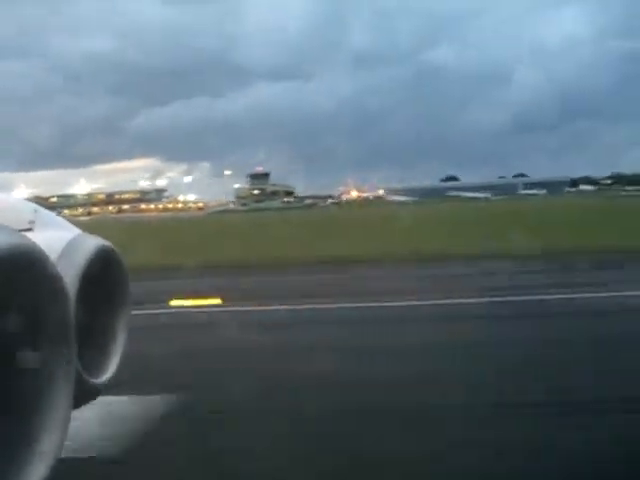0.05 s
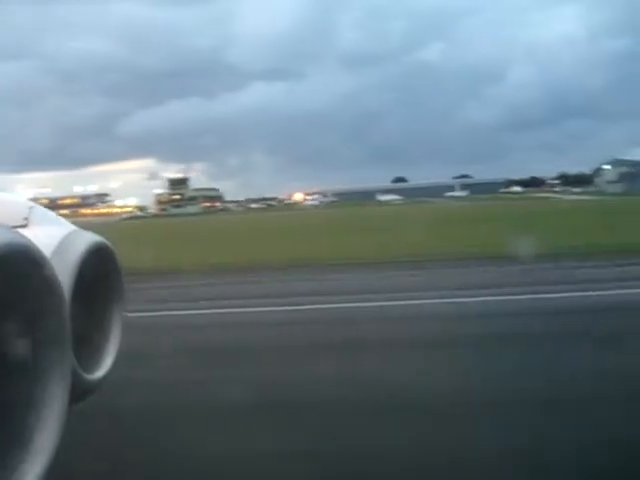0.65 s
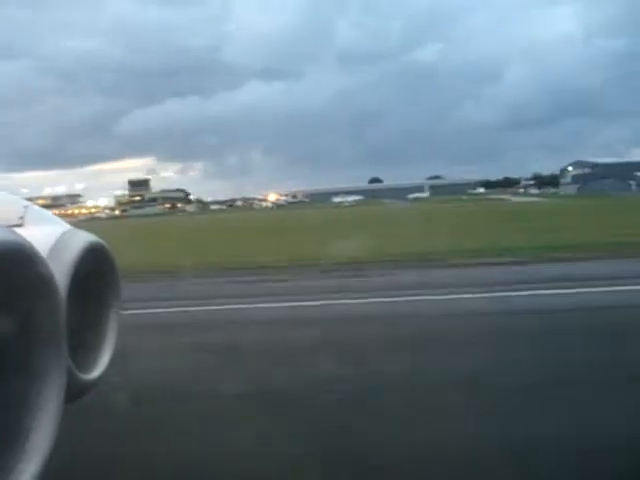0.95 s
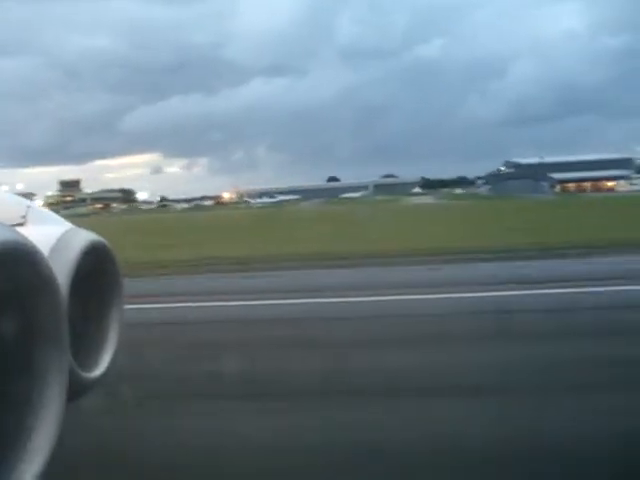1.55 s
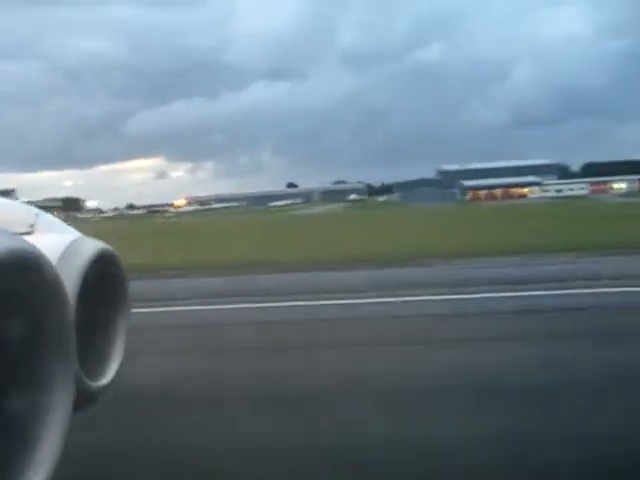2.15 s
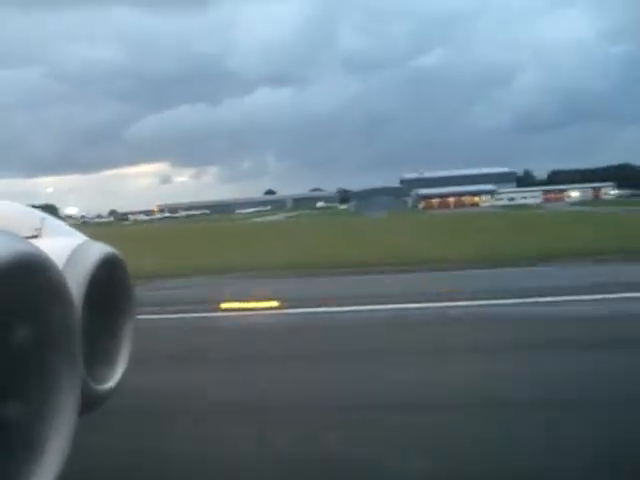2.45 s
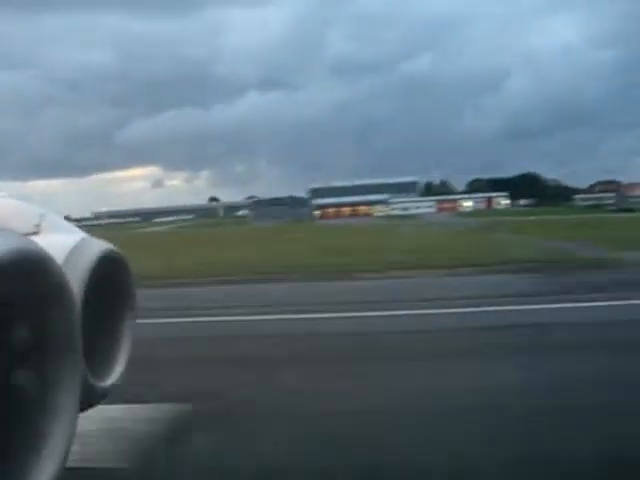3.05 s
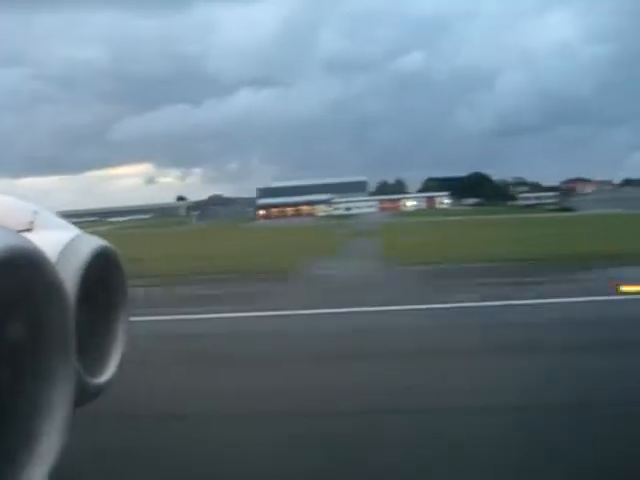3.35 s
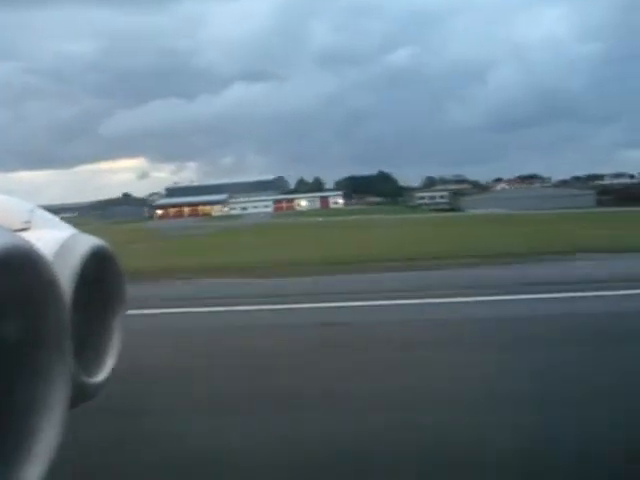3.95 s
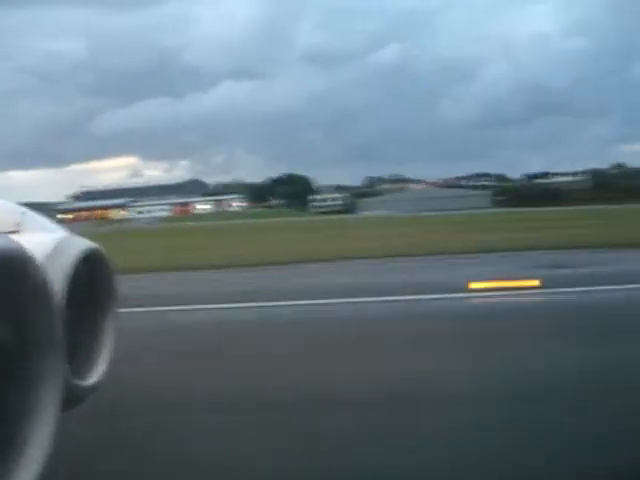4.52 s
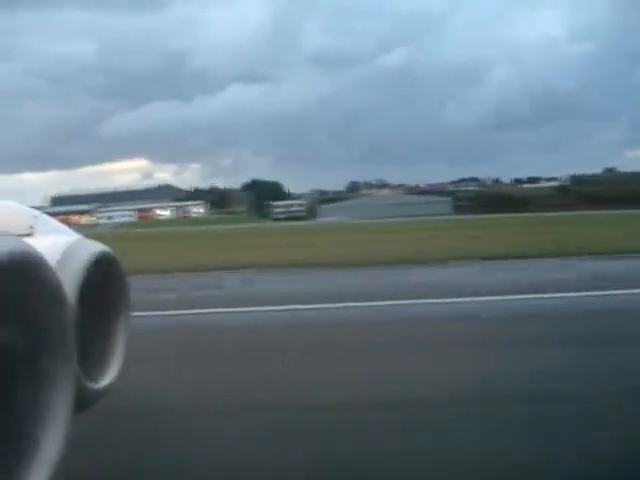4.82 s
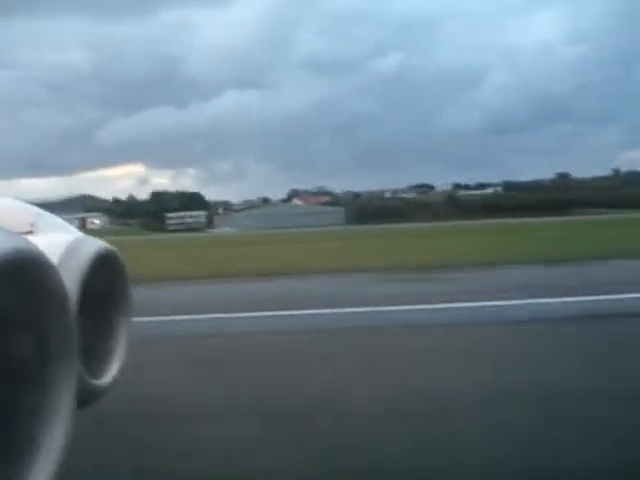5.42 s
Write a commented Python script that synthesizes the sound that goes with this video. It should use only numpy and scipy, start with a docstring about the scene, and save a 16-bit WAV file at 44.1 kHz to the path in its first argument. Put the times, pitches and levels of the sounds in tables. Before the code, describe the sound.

A heavy, steady roar of jet engines and rolling tyres fills a passenger cabin during the takeoff run. The airframe throbs deeply, quickening slightly, and low thumps come at uneven intervals. Under the roar, the engine fans whine thinly and air hisses, while loose plastic trim rattles softly near the start and again in the second half, with a few hollow knocks. The microphone by the window distorts slightly on the deepest peaks.

```python
"""Inside an airliner on its takeoff roll. Out-of-round tyres force the airframe into an ever faster throb
under the broadband rumble of runway and jets. The engine fans whine and buzz at harmonics of slightly
different shaft speeds, air hisses, and the cabin trim sizzles, rattles and ticks. The deepest bass
overloads the microphone, which chokes everything else for a few milliseconds at a time."""
import sys
import numpy as np
from scipy import signal
from scipy.fft import rfft, irfft
from scipy.io import wavfile
from scipy.ndimage import uniform_filter1d

SR = 44100
rng = np.random.default_rng(int(sys.argv[2]) if len(sys.argv) > 2 else 0)


def unload_wav(signal):
    """Save mono or channel-first audio to the path in sys.argv[1] as 16-bit WAV at rate SR, clipped to [-1, 1]."""
    wavfile.write(
        sys.argv[1],
        SR,
        np.round(np.clip(np.atleast_2d(signal).T, -1, 1) * 32767).astype(np.int16),
    )


N = 246078
TIME, FREQ = np.arange(N) / SR, np.fft.rfftfreq(N, 1 / SR)
FROM_MIDDLE_S = TIME - TIME.mean()

# runway roughness, which drives the rumble and shakes the trim: time_s, level_db
RUNWAY_ROUGHNESS = [(0, -0.1), (.4, -0.5), (.57, 1), (.9, -1), (1.28, 0.4), (1.46, -1), (1.75, 0.9),
                    (2.05, 3.5), (2.38, 1.5), (2.57, -1), (3.25, 1.5), (3.42, -2.5), (3.6, 1.5),
                    (4.05, 0.3), (4.55, 0.5), (4.95, 1), (5.58, 1.4)]


def gain_of(db):
    """Decibels as an amplitude ratio."""
    return 10 ** (np.asarray(db) / 20)


def unit_rms(x):
    """The signal normalised to rms 1."""
    return x / np.sqrt(np.mean(x ** 2) + 1e-20)


def contour(points):
    """Linear interpolation of (time_s, level_db) points at every sample."""
    return np.interp(TIME, *np.transpose(points))


def spectrum(points):
    """Spectral envelope in dB, interpolated over log frequency."""
    hz, db = np.transpose(points)
    return np.interp(np.log(FREQ + 1), np.log(hz + 1), db)


def resonance(centre_hz, width_hz):
    """A resonance peak in dB, with its width taken at half amplitude."""
    return -20 * np.log10(1 + (2 * (FREQ - centre_hz) / width_hz) ** 2)


def noise(spectrum_db):
    """Gaussian noise of rms 1, filtered to the given spectral shape."""
    return unit_rms(irfft(rfft(rng.standard_normal(N)) * gain_of(spectrum_db), N))


def drift(rate_hz):
    """Random modulation: noise of rms 1, low-passed at the given rate."""
    return noise(-20 * np.log10(1 + (FREQ / rate_hz) ** 4))


def tone(cycles, fade_db):
    """A sinusoid of rms 1 with random amplitude modulation."""
    return unit_rms(gain_of(fade_db * drift(18)) * np.cos(2 * np.pi * (cycles + rng.random())))


def bursts(peaks, rise_s, fall_s):
    """Envelope of events that grow and decay exponentially; being incoherent, they add in power."""
    return np.sqrt(sum((gain_of(db) * np.exp(-np.maximum((s - TIME) / rise_s, (TIME - s) / fall_s))) ** 2
                       for s, db in peaks))


def impact(start_s, rise_s, t60_s):
    """Envelope of a damped vibration: a quick rise, then exponential decay."""
    age = np.maximum(TIME - start_s, 0)
    return (1 - np.exp(-age / rise_s)) * gain_of(-60 * np.minimum(age / t60_s, 2))


def treble_dips():
    """Amplitude modulation for the high sounds, which dip or lift briefly."""
    dips = [(0.214, 0.05, 0.5), (1.08, 0.095, -2.7), (1.43, 0.077, -1.5), (2.578, 0.076, -1.5),
            (3.413, .08, -2), (4.243, .04, -1), (4.68, .08, -0.5)]  # brief level changes: centre_s, length_s, change_db
    return gain_of(sum(db / (1 + ((TIME - s) * 2 / length) ** 4) for s, length, db in dips))


def air(hiss_db=-49.5, hiss_db_per_s=0.7, rush_db=-57.0, rush_db_per_s=1.5, surge_db=-1.5):
    """Flow noise grows with airspeed: a hiss and a rush along the fuselage; a narrower hiss surges."""
    hiss_shape = [(1470, -28), (2500, -24), (2660, -2), (3450, 1.5), (4140, 3.5), (4340, 2), (4720, -0.5),
                  (6460, 8), (8310, 6.5), (8700, 7.5), (9390, 2.5), (11100, 2.5), (15600, -4.5)]  # steady air hiss: frequency_hz, density_db
    rush_shape = [(500, -28), (1100, 1), (1550, 16), (2300, -4), (2900, -26), (5000, -47)]  # airflow along the fuselage: frequency_hz, density_db
    surge_shape = [(2500, -13), (3500, -9), (3850, 5), (4400, 1), (5000, -6), (6500, -16)]  # hiss around 4 kHz: frequency_hz, density_db
    surges = [(1.72, -53), (1.98, -46), (2.1, -48.5), (2.24, -50)]  # surges of that hiss: peak_s, level_db
    hiss = noise(spectrum(hiss_shape)) * gain_of(hiss_db + hiss_db_per_s * FROM_MIDDLE_S)
    rush = noise(spectrum(rush_shape)) * gain_of(rush_db + rush_db_per_s * FROM_MIDDLE_S)
    surge = noise(spectrum(surge_shape)) * bursts(surges, rise_s=0.054, fall_s=0.085)
    return hiss + rush + surge * gain_of(surge_db)


def trim(level_db=-54.0, db_per_s=-0.06, coupling=1.2, grain_db=3.0, chatter_db=1.4, unsteady_db=1.3):
    """Friction noise: the cabin trim chafes in tiny grains, harder on rough runway and at each jolt."""
    sizzle_shape = [(1200, -43), (2000, 10), (3000, -0.5), (4800, 1.5), (6400, 0.5), (7800, 4), (9300, 2.5),
                    (11000, 3), (13000, -6), (15500, -35.5)]  # chafing trim: frequency_hz, density_db
    jolts = [(.13, -47), (.33, -50), (.8, -49), (1.24, -54), (1.87, -48), (2.3, -48), (2.39, -45),
             (2.75, -47), (2.87, -46), (3.06, -54), (3.29, -51), (4.18, -46.5), (4.32, -50), (4.56, -44.5),
             (4.79, -44), (4.87, -46), (5.35, -47)]  # jolts of the trim: peak_s, level_db
    runway_db = coupling * contour(RUNWAY_ROUGHNESS)
    shaken = gain_of(level_db + db_per_s * FROM_MIDDLE_S + runway_db + unsteady_db * drift(9.7))
    jolted = bursts(jolts, rise_s=0.014, fall_s=0.034)
    grains = unit_rms(gain_of(grain_db * drift(700) + chatter_db * drift(37)))
    return noise(spectrum(sizzle_shape)) * grains * np.hypot(shaken, jolted)


def rasps(half_width_hz=170, grain_db=-2.0):
    """Stick-slip friction: a rubbing fitting slips in tiny steps that ring one gliding resonance."""
    rubs = [(1.982, .07, -54, 3900, 4550), (2.056, 0.043, -53, 4230, 3900), (2.202, .048, -53, 4000, 4450)]  # rubs of the fitting: start_s, length_s, level_db, start_hz, end_hz
    out = np.zeros(N)
    for s, length, db, start_hz, end_hz in rubs:
        progress = np.clip((TIME - s) / length, 0, 1)
        phase = 2 * np.pi * np.cumsum(start_hz + (end_hz - start_hz) * progress) / SR
        ring = drift(half_width_hz) * np.cos(phase) + drift(half_width_hz) * np.sin(phase)
        out += ring * gain_of(db) * 2 * np.sqrt(progress * (1 - progress))
    return out * unit_rms(gain_of(grain_db * drift(200)))


def panel(chatter_db=-1.6, shift_db=4.0):
    """Bouts of tiny impacts excite a loose panel's modes; as the contact shifts, different ones ring."""
    modes = [(4290, 140, -13), (5630, 70, -18), (6362, 50, -5.5), (6450, 500, -6), (6620, 60, -13),
             (7630, 200, -8.5), (7900, 60, -16)]  # panel resonances: centre_hz, width_hz, level_db
    rattles = [(0.25, 0.07, -46), (0.333, 0.092, -49.5), (0.464, 0.085, -49.5), (0.753, 0.086, -49.5),
               (0.888, 0.05, -44), (1.17, 0.053, -51), (3.2, 0.065, -54), (3.553, 0.18, -49.5),
               (3.835, 0.1, -41), (3.865, 0.032, -44), (3.95, 0.068, -49.5), (4.259, 0.11, -46),
               (4.422, 0.19, -52), (4.72, 0.32, -47), (5.34, 0.052, -53.5), (5.385, .065, -48.5)]  # bouts of rattling: start_s, length_s, level_db
    panel_shape = [(2500, -15), (3800, -14.5), (5000, -5), (6400, -4), (7600, -3.5), (9200, -8),
                   (11300, -8), (13000, -15), (15500, -12)]  # broadband part of the rattle: frequency_hz, density_db
    ring = sum(noise(resonance(hz, width)) * gain_of(db) * unit_rms(gain_of(shift_db * drift(18)))
               for hz, width, db in modes)
    # each bout starts fast and ebbs
    bouts = sum(gain_of(db) * np.interp(TIME, s + length * np.array([0, .15, .6, 1.3]), [0, 1, .8, 0])
                for s, length, db in rattles)
    return (noise(spectrum(panel_shape)) + ring) * bouts * gain_of(chatter_db * drift(90))


def ticks(gain_db=1.0):
    """Plastic edges snap together; so short an impulse has a broad spectrum and no pitch."""
    snaps = [(0.89, -43, 0), (1.888, -38, -5), (2.101, -47, -4), (2.297, -42, 1), (2.431, -46, -10),
             (2.827, -44, 1), (2.866, -43, -2), (2.89, -44, 5), (3.292, -34, -1), (3.343, -39, -4),
             (3.864, -40, 0), (3.95, -41, 3), (4.268, -43, 3), (5.341, -41, 2), (5.497, -39, -1)]  # snaps of the trim: start_s, level_db, tilt_db_per_octave
    tick_shape = [(800, -12), (2000, -1), (3500, 0), (5500, -5), (8000, 4), (11000, -4), (15500, -18)]  # one snap: frequency_hz, density_db
    octaves = np.log2(np.maximum(FREQ, 1000))
    out = np.zeros(N)
    for s, db, tilt in snaps:
        crack = noise(spectrum(tick_shape) + tilt * octaves)
        out += crack * impact(s, rise_s=0.00046, t60_s=0.044) * gain_of(db + gain_db)
    return out


def fittings(gain_db=5.5, rise_s=0.002):
    """Damped resonance: each knock of a cabin fitting dies quickly in one broad band."""
    knocks = [(0.348, -30, 840, 400, 0.12), (1.202, -21.5, 350, 200, 0.19), (1.863, -43, 5850, 700, 0.064),
              (2.87, -45, 1800, 1000, 0.055), (3.481, -40.5, 1630, 1000, 0.1),
              (3.815, -44, 1500, 900, 0.24), (3.86, -38, 1770, 800, 0.056), (3.984, -17, 281, 128, 0.16),
              (4.874, -19.5, 298, 149, 0.12)]  # knocks of the fittings: start_s, level_db, centre_hz, width_hz, t60_s
    return sum(noise(resonance(hz, width)) * impact(s, rise_s, t60) * gain_of(db + gain_db)
               for s, db, hz, width, t60 in knocks)


def fan_buzz(waver=0.00086, flutter=0.0015, fade_db=2.5, db_per_s=0.7):
    """Two fans buzz at shaft harmonics, slowly louder; turbulence modulates pitch and level."""
    shafts_hz = (109.3, 110.35)  # speeds of the two nearest fans: shaft_hz
    orders = (9, 10, 11, 12, 13, 15, 17, 18, 19, 20, 21, 23)  # shaft harmonics that buzz: harmonic_number
    order_levels = [(-49.6, -72), (-56, -61), (-56.5, -74), (-74, -61), (-60, -74), (-66, -78), (-68, -78),
                    (-67.5, -78), (-73, -74), (-61, -63), (-62.5, -70), (-74, -80)]  # strength of each harmonic: first_fan_db, second_fan_db
    out = np.zeros(N)
    for hz, levels in zip(shafts_hz, np.transpose(order_levels)):
        turns = np.cumsum(hz * (1 + waver * drift(4.2) + flutter * drift(50))) / SR
        for order, db in zip(orders, levels):
            out += gain_of(db) * tone(order * turns, fade_db)
    return out * gain_of(db_per_s * FROM_MIDDLE_S)


def fan_blades(blade_count=40, waver=0.00084, flutter=0.000966, fade_db=4.5, sway_db=1.0, swell_s=.045):
    """Fans whistle at the blade-passing frequency and whine at twice and three times it, in swells."""
    blade_tones = [(109.3, -65.7, -63.2, -73.5), (109.85, -69.5, -65.3, -77), (110.35, -69, -68, -78)]  # each fan's tones: shaft_hz, fundamental_db, second_db, third_db
    whistle_swells = [(.34, -2), (.66, -1), (.8, -3), (1.32, -9), (1.66, -4), (2.46, -7)]  # swells of the fundamental: peak_s, relative_db
    whine_swells = [(.35, 1), (.74, 6), (2.15, 4), (2.26, 1), (5.35, -2)]  # swells of the second harmonic: peak_s, relative_db
    swells = [1 + bursts(whistle_swells, swell_s, swell_s), 1 + bursts(whine_swells, swell_s, swell_s), 1]
    out = np.zeros(N)
    for hz, *levels in blade_tones:
        passes = np.cumsum(blade_count * hz * (1 + waver * drift(4.25) + flutter * drift(57))) / SR
        for harmonic, db, swell in zip((1, 2, 3), levels, swells):
            out += gain_of(db) * swell * tone(harmonic * passes, fade_db)
    return out * unit_rms(gain_of(sway_db * drift(4.7)))


def gear_bumps(half_width_s=.003, gain_db=-10.5):
    """Each landing-gear bump is one deep, one-sided push of pressure; written here as the push and pull that
    remain once the bass is cut."""
    bumps = [.238, 1.063, 1.383, 1.442, 2.539, 2.824, 3.255, 3.363, 4.059, 4.39, 4.485, 5.207, 5.462]  # bumps of the gear: centre_s
    offsets = ((TIME - s) / half_width_s for s in bumps)
    return gain_of(gain_db) * sum(-x * np.exp(-np.minimum(x ** 2 / 2, 50)) for x in offsets)


def rumble(level_db=-19.5, lumpy_db=0.83):
    """Transmission through the cabin wall leaves the lows of runway and jet roar, lumpy with the road."""
    rumble_shape = [(20, -25.5), (40, -7.5), (62, 0), (110, -0.5), (140, -3.5), (178, -1.5), (222, -6),
                    (295, -0.5), (345, -5.5), (385, -3.5), (460, -12), (660, -16), (780, -22.5),
                    (1250, -33.5), (2200, -45), (2800, -54.5), (6000, -67)]  # roar inside the cabin: frequency_hz, density_db
    roar = noise(spectrum(rumble_shape))
    return roar * gain_of(level_db + contour(RUNWAY_ROUGHNESS) + lumpy_db * drift(19.6))


def wheels(start_hz=16.08, hz_per_s=.67, wander_turns=0.009, once_db=-33.5,
           tyre_lag=.047, in_step_s=3.3, tyre_db=-30.5, tyre_db_per_s=2.0):
    """Forced vibration: out-of-round tyres shake the airframe once, twice and three times a turn."""
    twice_levels = [(0, -41), (.4, -24), (1, -34.5), (2.5, -22.5), (3.1, -18), (3.9, -26), (4.4, -19.5),
                    (5.58, -19)]  # throb at twice a turn: time_s, level_db
    thrice_levels = [(0, -17.5), (.2, -12.5), (.39, -18), (.46, -30), (.62, -24), (.71, -15.5),
                     (1.5, -12.5), (1.9, -20), (2.15, -27), (2.35, -17.5), (3, -21), (3.32, -15),
                     (3.9, -31), (4.1, -19.5), (5.58, -32)]  # main drone, at three times a turn: time_s, level_db
    turns = np.cumsum(start_hz + hz_per_s * TIME) / SR + wander_turns * drift(0.98)
    once, twice, thrice = 2 * np.pi * (np.outer([1, 2, 3], turns) + rng.random((3, 1)))
    # a slightly larger tyre turns more slowly and beats against the drone, louder with speed
    turns_behind = tyre_lag * (turns - np.interp(in_step_s, TIME, turns))
    larger_tyre = np.cos(thrice - 2 * np.pi * 3 * turns_behind)
    return (gain_of(once_db) * np.cos(once)
            + gain_of(contour(twice_levels)) * np.cos(twice)
            + gain_of(contour(thrice_levels)) * np.cos(thrice)
            + gain_of(tyre_db + tyre_db_per_s * FROM_MIDDLE_S) * larger_tyre)


def overload(pressure, squash=.8, recovery_s=.001, cling=.5):
    """Asymmetric clipping; after a long overload the microphone briefly dulls and clings to its limit."""
    limits = (-.93, .77)  # overload pressures: lower_full_scale, upper_full_scale
    excess = pressure - np.clip(pressure, *limits)
    clipped = pressure - squash * excess
    leak = np.exp(-1 / (recovery_s * SR))
    charge = signal.lfilter([1 - leak], [1, -leak], (excess != 0) * 1.)
    stuck = np.interp(charge, [.72, .93], [0, 1])
    dull = uniform_filter1d(uniform_filter1d(clipped, size=17), size=13)
    held = dull + cling * (np.where(pressure < 0, *limits) - dull)
    return clipped + stuck * (held - clipped)


def scene():
    """Superposition of all sources at the window seat."""
    dips = treble_dips()
    engines = fan_buzz() + fan_blades() * dips ** 2
    cabin = (air() + trim()) * dips + panel() + fittings() + ticks() + rasps()
    return (wheels() + gear_bumps() + rumble() + engines + cabin)[None]


def record(dry, bass_cut_hz=160, ceiling=.49, band_edge_hz=15750):
    """The microphone saturates ahead of its high-pass filter; soft limiting and a low-pass follow."""
    bass_cut = (3 + 1j * FREQ) / (bass_cut_hz + 1j * FREQ)
    pressure = irfft(rfft(dry) / bass_cut, N)  # ahead of the cut, deep bass is far stronger
    heard = irfft(rfft(overload(pressure)) * bass_cut, N)
    rounded = heard / (1 + (heard / ceiling) ** 12) ** (1 / 12)
    low_pass = signal.firwin(511, band_edge_hz, window=("kaiser", 9), fs=SR)
    return signal.oaconvolve(rounded, low_pass[None], "same")


dry = scene()
out = record(dry)
unload_wav(out)
```